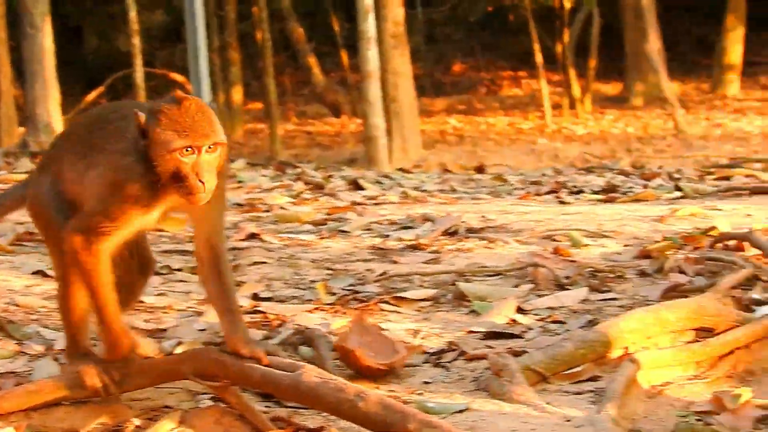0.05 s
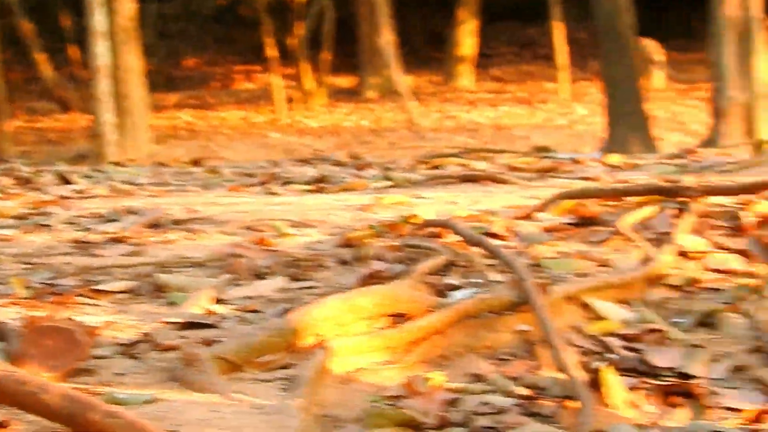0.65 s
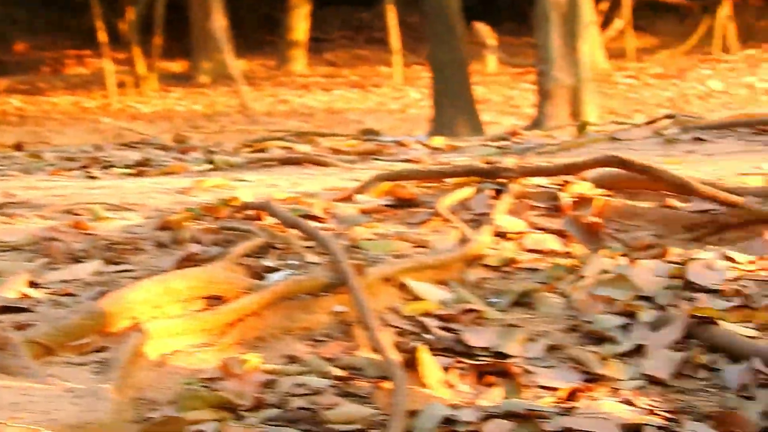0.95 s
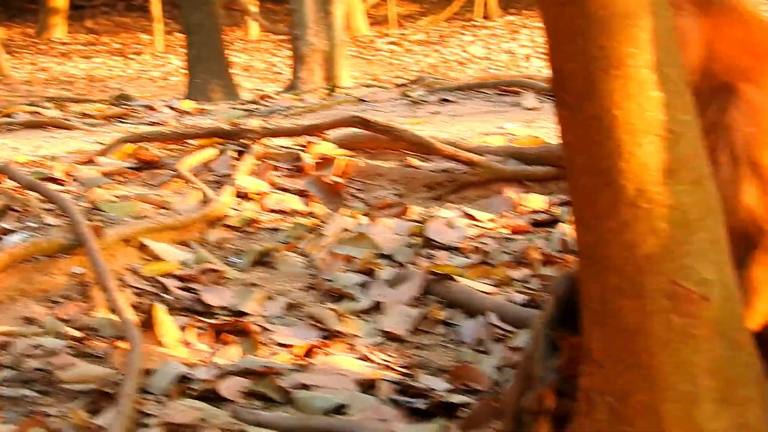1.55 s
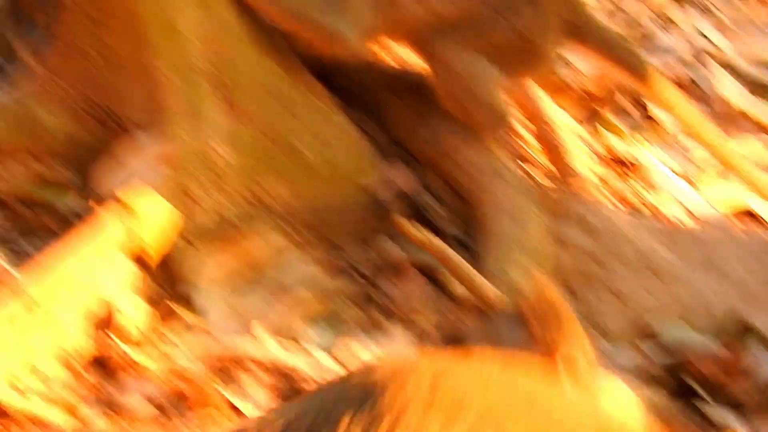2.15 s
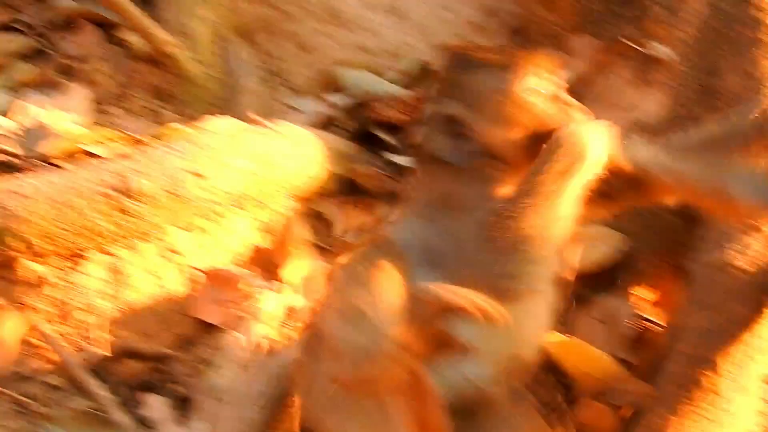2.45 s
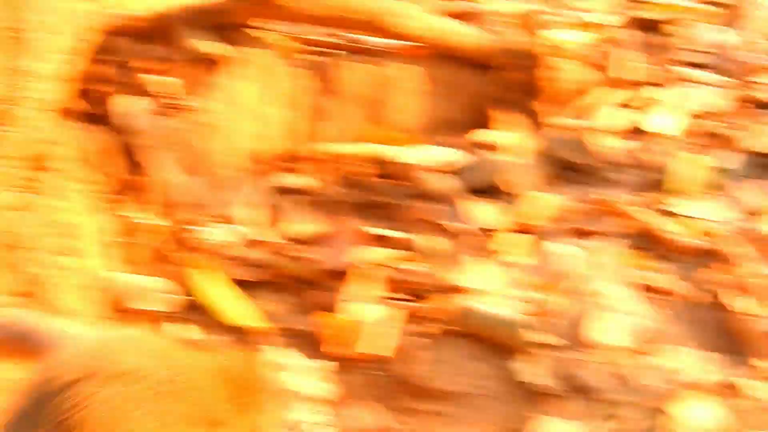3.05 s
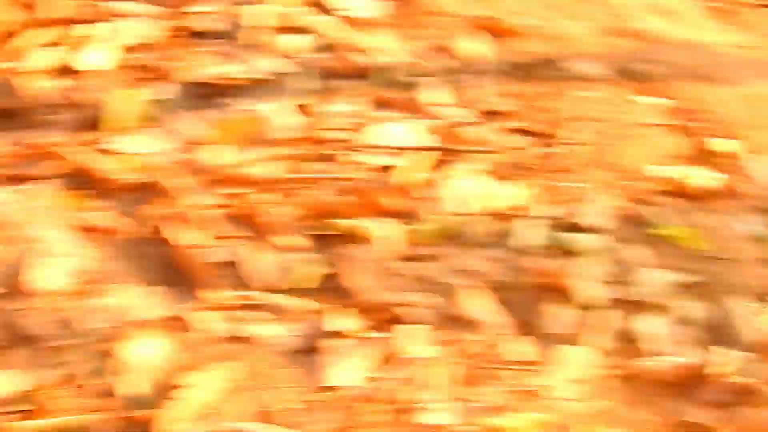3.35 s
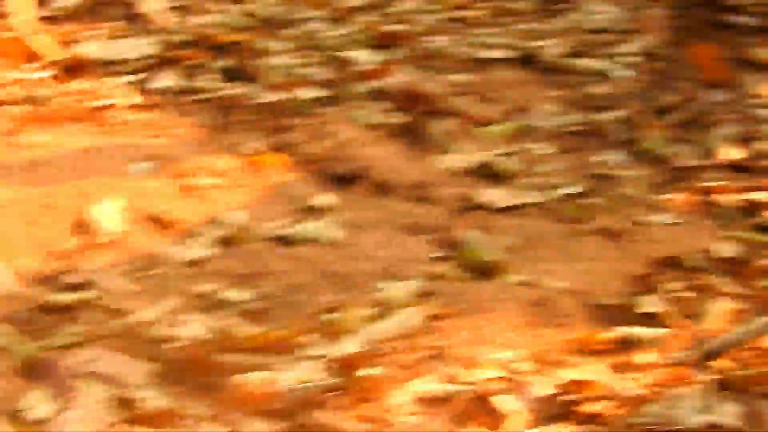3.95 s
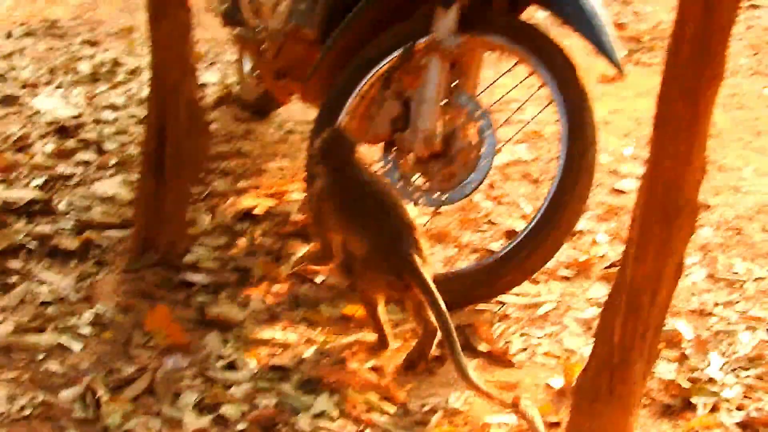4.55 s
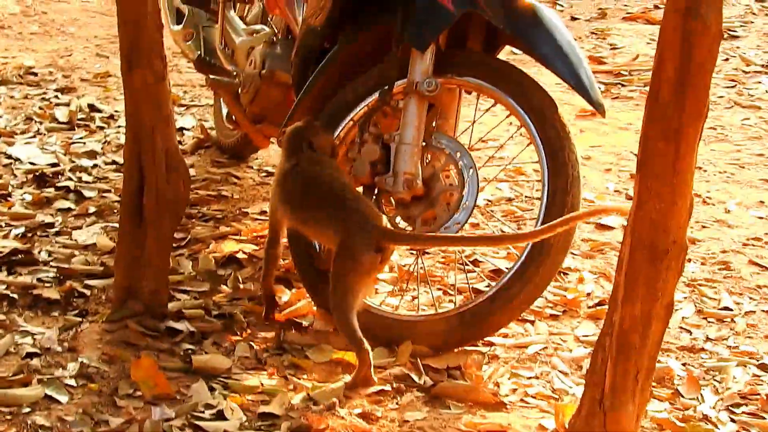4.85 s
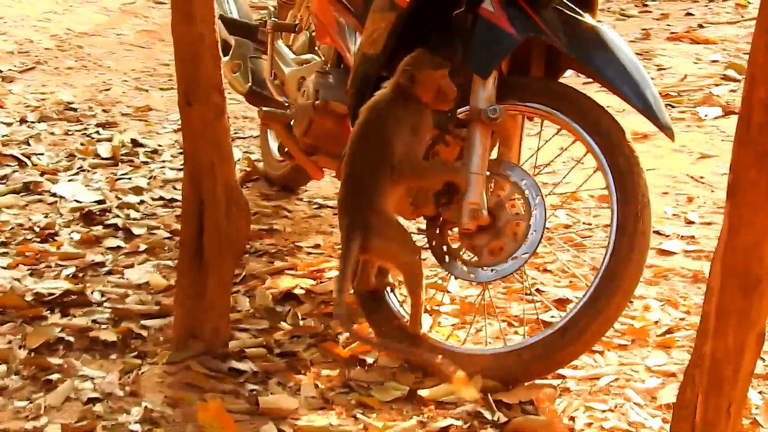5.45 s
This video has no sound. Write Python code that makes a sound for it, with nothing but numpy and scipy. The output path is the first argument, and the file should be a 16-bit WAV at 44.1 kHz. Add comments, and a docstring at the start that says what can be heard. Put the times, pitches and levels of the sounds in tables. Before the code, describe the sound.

Light, quick footfalls crunch and rustle in dry leaf litter as small monkeys run up close and away, with soft scuffs and twig ticks.

```python
"""First, faint footfalls in dry leaves: young monkeys scamper up to the microphone and run off again. Each foot
crushes a swarm of tiny cracks out of the forest floor, and the leaves rustle as they settle. Dull scuffs, a
thump and ticking twigs come from either side; something hollow is knocked once, and near the end a wheel
clatters as a monkey climbs it. A faint low outdoor hum lies behind it all, and near the end leaves swish
further off."""
import sys
import numpy as np
from scipy import signal
from scipy.fft import rfft, irfft
from scipy.io import wavfile
from scipy.ndimage import uniform_filter1d

SR = 44100
rng = np.random.default_rng(int(sys.argv[2]) if len(sys.argv) > 2 else 0)


def unload_audio(sound):
    """Save the sound as a 16-bit wav file, at the path given as the first command line argument."""
    columns = np.transpose(np.atleast_2d(sound))
    # keep every value between -1 and 1, then stretch to whole-number steps
    steps = np.round(np.clip(columns, -1, 1) * 32767)
    wavfile.write(sys.argv[1], SR, steps.astype(np.int16))


N = 247004
TIME = np.arange(N) / SR
FREQS = np.maximum(np.arange(N // 2 + 1) * SR / N, 1)
BODY_BAND = 1 / (1 + (FREQS / 4190) ** 12)   # the dull body of the leaf sound, below 4190 Hz


def from_db(db):
    """Decibels to gain."""
    return 10 ** (np.asarray(db) / 20)


def unit_rms(x):
    """Scale to rms 1."""
    return x / np.sqrt(np.mean(x ** 2) + 1e-20)


def in_time(points):
    """A curve of (t/s, value) points at every sample."""
    return np.interp(TIME, *np.transpose(points))


def response(points):
    """Gain at every frequency from (f/Hz, level/dB) points."""
    hz, db = np.transpose(points)
    return from_db(np.interp(np.log(FREQS), np.log(hz), db))


def resonance(hz, width_hz):
    """Gain of a broad resonance with steep skirts, 1 on top."""
    return 1 / (1 + .5 * ((FREQS - hz * hz / FREQS) / width_hz) ** 2)


def shaped(x, gain):
    """Filter by a gain per frequency."""
    return irfft(rfft(x) * gain, N)


def noise(gain):
    """Mono noise of the given spectrum; rms 1."""
    return unit_rms(shaped(rng.standard_normal(N), gain))


def coloured(x, hz, width_hz, boost):
    """Raise one resonance out of a sound; rms 1."""
    peak = signal.iirpeak(hz, hz / width_hz, fs=SR)
    return unit_rms(x + boost * signal.lfilter(*peak, x))


def ring(clicks, hz, t60):
    """A unit click sets a sine of height 1 ringing."""
    decay, angle = from_db(-60 / (t60 * SR)), 2 * np.pi * hz / SR
    return signal.lfilter([0, np.sin(angle)], [1, -2 * decay * np.cos(angle), decay ** 2], clicks + 1e-18)


def swell(start, rise, t60, hold=0):
    """Pressure builds over the rise time, holds, then dies away."""
    age = TIME - start
    fall_db = -60 * np.clip((age - rise - hold) / t60, 0, 2)
    return np.clip(age / rise, 0, 1) * from_db(fall_db)


def panned(x, lean_db):
    """Place a sound at constant power; lean is left minus right."""
    gains = from_db(np.outer([.5, -.5], lean_db))
    return x * gains / np.sqrt(np.mean(gains ** 2, axis=0))


# stereo width at the microphone: f/Hz, side gain/dB
SIDE_GAIN = [(130, -31), (300, -19), (1000, -14), (2200, -13), (3600, -12.5), (5000, -6.5), (6500, -3.8),
             (9000, -2.4), (12000, -.4)]
def stereo(mid, side):
    """Left and right agree in the bass and part ways in the treble."""
    return mid + shaped(side, response(SIDE_GAIN)) * np.array([[1], [-1]])


def cracks(per_s, spread_db, cap, width_hz):
    """Stereo swarm of tiny cracks, each of its own size, place and leaf pitch."""
    born = np.flatnonzero(rng.random(N) < per_s / SR)
    count = len(born)
    size = from_db(spread_db * np.minimum(rng.exponential(1, count), cap)) * rng.choice([-1, 1], count)
    place, mid_side = rng.standard_normal(count), np.zeros((2, N))
    for hz in np.linspace(900, 15000, 14):
        clicks = np.zeros((2, N))
        strength = size * rng.standard_normal(count)   # every crack excites the leaf modes differently
        clicks[:, born] = strength, strength * (place + rng.standard_normal(count)) / np.sqrt(2)
        mid_side += ring(clicks, hz, t60=np.log(1000) / (np.pi * width_hz))
    return stereo(*mid_side)


def shifting(x, patchy_db):
    """As leaves slide and curl, their resonances come and go."""
    bins = signal.stft(x, nperseg=512)[2]
    patches = uniform_filter1d(rng.standard_normal(bins.shape[1:]), 5, axis=0)   # smooth in frequency
    patches = unit_rms(uniform_filter1d(patches, 10, axis=1))   # and in time
    return signal.istft(bins * from_db(patchy_db * patches), nperseg=512)[1][:, :N]


def leaf_bands(colour):
    """Two filter gains: the crisp top from brittle edges, the lower body from flexing blades."""
    gain = response(colour)
    return gain * (1 - BODY_BAND), gain * BODY_BAND


# spectrum of crushed leaves: f/Hz, level/dB
CRUSH_SPECTRUM = [(290, -59), (500, -59), (545, -40.5), (906, -25.5), (1380, -16), (2260, -9), (2770, -14),
                  (3290, -9), (3920, -9), (4660, 0.5), (6230, 6.5), (7000, 4), (8830, -9.5), (14000, -33),
                  (16000, -38)]
# feet nearing the microphone, then leaving: t/s, rise/s, hold/s, level/dB, depth (body re crackle)/dB,
# blade resonance f/Hz
FOOTFALLS = [(0, 0.0019, 0, -44.5, -2.5, 3870), (0.151, .014, .03, -48.5, -3, 1710),
             (0.698, 0.01, 0, -45.5, -1.5, 2300), (0.922, 0.008, 0.0027, -40.5, -4.5, 3400),
             (1.148, 0.0089, 0.022, -36, -25, 3400), (1.261, 0.0032, 0, -29, -11, 3670),
             (1.373, 0.0045, 0.0054, -30, -6.5, 2100), (1.473, 0.0069, .005, -27.5, -14, 3800),
             (1.514, 0.013, 0.012, -25, -9, 4000), (1.606, 0.0079, 0, -32.5, -3, 3800),
             (1.797, 0.0086, 0, -37, -2.5, 3300), (1.924, 0.011, 0.013, -40, -3, 2200),
             (1.964, .004, 0.0034, -31.5, -4, 3830), (1.993, 0.024, 0.0094, -26.5, -5, 3040),
             (2.094, 0.0027, 0.0086, -26.5, -8, 3730), (2.162, 0.023, 0.0067, -26.5, -10, 1930),
             (2.488, .018, 0.00095, -34.5, -3.5, 1370), (2.595, 0.0097, 0.056, -33, -8, 2160),
             (2.667, .009, 0.0051, -26, -5.5, 3400), (2.73, 0.0054, 0.053, -22, -8, 3400),
             (2.795, 0.025, .05, -25.5, -6.5, 3400), (2.982, .002, .005, -32, -8.5, 3700),
             (2.999, 0.015, 0.019, -28.5, -9, 3760), (3.074, 0.028, 0.032, -26, -4, 2730),
             (3.465, .01, 0.042, -28.5, -7.5, 2380), (3.646, 0.0032, .035, -32, -6, 1760),
             (3.952, .01, 0.016, -53, 1, 3080), (4.122, 0.0083, 0.058, -44, -9.5, 2440)]
def footfalls(light_depth_db=-9, light_edge_hz=6180, octaves_per_db=0.9):
    """Each foot crushes its own patch of leaves and pushes softly on the soil."""
    swarm = shifting(cracks(per_s=7000, spread_db=2.2, cap=1.4, width_hz=1960), patchy_db=3)
    edges, blades = (unit_rms(shaped(swarm, band)) for band in leaf_bands(CRUSH_SPECTRUM))
    soil = from_db(-35.5) * noise(resonance(596, width_hz=420))
    out = np.zeros((2, N))
    for start, rise, hold, level_db, depth_db, blade_hz in FOOTFALLS:
        first = int(start * SR)
        crush = swell(start, rise, t60=0.15, hold=hold)
        settle = swell(start, rise, t60=0.49, hold=hold)
        tread = from_db(level_db) * (crush + settle)[first:first + SR] / 2
        patch = rng.integers(N - SR) + np.arange(len(tread))
        # a deeper tread breaks larger pieces, which sound lower
        edge_hz = light_edge_hz / 2 ** (octaves_per_db * max(depth_db - light_depth_db, 0))
        crisp = coloured(edges[:, patch], edge_hz, width_hz=1400, boost=0.79)
        body = coloured(blades[:, patch], blade_hz, width_hz=600, boost=1)
        out[:, first:first + SR] += tread * (crisp + from_db(depth_db) * body + soil[patch])
    return out


# spectrum of stirred leaves: f/Hz, level/dB
RUSTLE_SPECTRUM = [(350, -68), (600, -13), (801, -13.5), (919, -21), (1410, -8), (1930, -9.5), (2440, -6.5),
                   (3480, -6.5), (3890, -11.5), (5790, -1), (6550, -1), (9360, -20), (11700, -33),
                   (14900, -44), (16000, -49)]
# stirring of the leaves around the microphone: t/s, relative level/dB
LEAF_STIR = [(0.0, -50.5), (1.46, -35), (1.68, -40), (1.9, -40), (2.14, -35), (2.31, -40.5), (2.59, -43),
             (2.79, -46), (2.93, -36), (3.27, -36.5), (3.6, -41.5), (3.87, -43), (4.04, -47.5), (4.26, -52),
             (4.43, -54.5), (5.16, -51), (5.4, -47), (5.6, -43.5)]
def rustle(body_follows=0.53):
    """Finer crackle between footfalls; its body swings less than its top, so louder is crisper."""
    stir_db = in_time(LEAF_STIR)
    crisp_db = stir_db - 1
    body_db = -53.5 + body_follows * (stir_db - stir_db.mean())
    swarm = shifting(cracks(per_s=6000, spread_db=0.5, cap=8.1, width_hz=1250), patchy_db=3.5)
    edges, blades = (unit_rms(shaped(swarm, band)) for band in leaf_bands(RUSTLE_SPECTRUM))
    return from_db(crisp_db) * edges + from_db(body_db) * blades


# spectra of the outdoor hum and of a far drone: f/Hz, level/dB
HUM_SPECTRUM = [(20, -41), (38, -27), (55, -6.5), (90, -3), (140, -0.5), (215, 0.5), (300, -3),
                (400, -11.5), (550, -20), (800, -17), (1200, -5), (2400, -10), (8000, -86)]
DRONE_SPECTRUM = [(120, -47), (220, -4), (295, 5), (350, -6.5), (440, -2), (560, -7), (750, -31),
                  (3000, -90)]
# the hum swells a little and dips: t/s, level/dB
HUM_LEVEL = [(0, -61), (1.1, -60), (1.9, -57.5), (2.4, -60.5), (3.1, -57), (3.35, -63.5), (4.2, -60.5),
             (5.6, -58.5)]
def forest_ambience(drone_grows_s=3.65, drone_db_per_s=7.5):
    """Low hum all around, a far drone that grows late, and a thin buzz as of distant insects."""
    hum = unit_rms(stereo(*shaped(rng.standard_normal((2, N)), response(HUM_SPECTRUM))))
    drone = noise(response(DRONE_SPECTRUM))
    drone_db = -71 + drone_db_per_s * np.maximum(TIME - drone_grows_s, 0)
    buzz = unit_rms(stereo(*shaped(rng.standard_normal((2, N)), resonance(6380, width_hz=330))))
    return from_db(in_time(HUM_LEVEL)) * hum + from_db(drone_db) * drone + from_db(-56) * buzz


# dull scuffs on either side of the microphone: t/s, rise/s, f/Hz, width/Hz, level/dB, lean/dB
SCUFF_STROKES = [(.236, 0.069, 1320, 200, -37.5, 2), (.85, 0.022, 1150, 650, -45, 5),
                 (.85, .012, 3250, 450, -38, 0), (1.1, 0.047, 1310, 280, -44, 5),
                 (1.549, .007, 1270, 350, -44.5, 2), (1.765, .04, 1300, 550, -49, 1),
                 (2.37, 0.034, 810, 400, -53, 1), (2.59, 0.017, 1000, 300, -44.5, -1),
                 (4.33, .06, 705, 55, -43, -4), (4.36, 0.054, 1130, 330, -51, 1),
                 (4.37, 0.091, 170, 300, -52, 0), (4.73, 0.075, 1400, 800, -53.5, 13),
                 (4.88, 0.06, 1400, 800, -53, 4), (5.2, 0.069, 960, 433, -43, -7.5),
                 (5.451, .008, 2300, 1000, -41, -3), (5.486, .008, 1600, 900, -37, -2)]
def scuffs(slips_per_s=1800, smooth_share=0.45, lowpass_hz=7000):
    """Quick uneven slips excite one resonance with a broad skirt each time."""
    friction = rng.standard_normal((2, N)) * ((rng.random(N) < slips_per_s / SR) + smooth_share)
    slips = stereo(*friction)
    out = np.zeros((2, N))
    for start, rise, hz, width_hz, level_db, lean_db in SCUFF_STROKES:
        skirt = from_db(-20.5) * resonance(1.1 * hz, width_hz=1400)
        scrape = unit_rms(shaped(slips, resonance(hz, width_hz) + skirt))
        out += panned(from_db(level_db) * swell(start, rise, t60=0.34) * scrape, lean_db)
    return shaped(out, 1 / (1 + (FREQS / lowpass_hz) ** 4))


# thud and clack, centre of the image: rise/s, t60/s, f/Hz, width/Hz, relative level/dB
THUMP_PARTS = [(0.021, 0.23, 208, 59, 0.5), (0.0014, 0.039, 1160, 430, 9)]
def thump(start=0.849, level_db=-41.5):
    """Something lands with a short clack and a low thud."""
    return sum(from_db(level_db + db) * swell(start, rise, t60) * noise(resonance(hz, width_hz))
               for rise, t60, hz, width_hz, db in THUMP_PARTS)


def struck(blows, modes, contact_hz):
    """Every blow rings all the modes at the pitch of the piece it hits; a soft contact dulls it."""
    contact = signal.butter(2, contact_hz, fs=SR, output="sos")
    out = np.zeros((2, N))
    for start, level_db, pitch, lean_db in blows:
        first = int(start * SR)
        click = signal.unit_impulse(min(SR // 2, N - first))
        tone = np.zeros(len(click))
        for k, (hz, db, t60) in enumerate(modes):
            mode = (-1) ** k * from_db(level_db + db) * ring(click, hz * pitch, t60)
            # little radiates below a mode
            radiation = signal.butter(2, 0.73 * hz * pitch, "high", fs=SR, output="sos")
            tone += signal.sosfilt(radiation, mode)
        out[:, first:first + len(tone)] += panned(signal.sosfilt(contact, tone), lean_db)
    return out


# modes of the small struck pieces, twigs and a wheel: f/Hz, relative level/dB, t60/s
TICK_MODES = [(1080, -28, 0.012), (1280, -12.5, 0.013), (2584, -5.5, 0.028), (3180, 1.5, 0.0092),
              (3500, -7, 0.025)]
# twig ticks left of the microphone, then a wheel clattering a little right: t/s, strike level/dB, pitch ratio,
# lean/dB
TICK_BLOWS = [(.8495, -20.5, 1.02, 7), (.881, -29, 1.06, 7), (3.8475, -22.5, .99, 13),
              (3.888, -23, 1.02, 15), (5.4565, -28, .48, -3), (5.4625, -27, .7, -6), (5.4935, -24, .72, -2),
              (5.497, -28, 1.1, -2), (5.5025, -21, .66, -2), (5.5175, -22.5, .42, -2),
              (5.539, -39, .66, -2)]
def twigs_and_wheel():
    """Twigs tick together and ring briefly; near the end a wheel clatters as a monkey climbs it."""
    return struck(TICK_BLOWS, TICK_MODES, contact_hz=5560)


def tree_echo(x):
    """Trunks and ground scatter a thin, short tail back to the microphone."""
    tail = (rng.standard_normal((2, N)) * swell(0, rise=0.003, t60=0.52))[:, :SR]
    tail /= np.sqrt(np.sum(tail ** 2, axis=1, keepdims=True))
    mono = x.mean(axis=0, keepdims=True)
    return stereo(*signal.fftconvolve(mono, tail, axes=1)[:, :N])


# single leaves breaking close by: t/s, level/dB, body re crack/dB
LEAF_SNAPS = [(1.2645, -23, -12), (1.378, -15, -2), (1.48, -20, -12), (1.527, -20, -8), (1.9685, -24, -10),
              (2.0255, -16, -10), (2.0978, -15, -12), (2.1, -15, -12), (2.1035, -14, -6), (2.197, -19, -12),
              (2.286, -24, -8), (2.674, -17, -9), (2.7355, -12, -10), (2.743, -14, -6), (2.774, -15, -10),
              (2.986, -19, -11), (3.018, -15.5, -11), (3.4705, -19, -9), (3.651, -15, -4),
              (3.888, -21, -10), (4.0885, -29, -14)]
def leaf_snaps(tear_db=-14, tear_t60=0.012):
    """A leaf breaks with one sharp crack and tears on for a few milliseconds."""
    crisp, body = np.zeros((2, 2, N))
    age = TIME[:SR // 20]
    for start, level_db, body_db in LEAF_SNAPS:
        first = int(start * SR)
        crack = from_db(tear_db - 60 * age / tear_t60) * rng.standard_normal((2, len(age)))
        crack[0, 0] = 1   # the break itself, in the mid channel
        crisp[:, first:first + len(age)] += from_db(level_db) * crack
        body[:, first:first + len(age)] += from_db(level_db + body_db) * crack
    edge, blade = leaf_bands(CRUSH_SPECTRUM)
    return stereo(*(shaped(crisp, edge / edge.mean()) + shaped(body, blade / blade.mean())))


# modes of the hollow thing: f/Hz, relative level/dB, t60/s
HOLLOW_MODES = [(183, -38, .3), (982, -15, .21), (1400, -17, .05), (1220, 1, .011), (2450, -22, .02)]
# one knock, almost straight ahead: t/s, strike level/dB, pitch ratio, lean/dB
KNOCK_BLOWS = [(1.7539, -13, 1, 1), (1.7606, -22, 1, 1)]
def hollow_knock():
    """Something hollow rings from two contacts so close that they sound as one."""
    return struck(KNOCK_BLOWS, HOLLOW_MODES, contact_hz=3000)


# leaves far from the microphone: t/s, rise/s, hold/s, level/dB
FAR_SWISHES = [(4.582, 0.048, 0.2, -60), (5.12, .08, 0.27, -65)]
def far_swishes():
    """Brushed leaves give a soft swish of fine, high crackle."""
    swarm = cracks(per_s=6000, spread_db=-3, cap=4.6, width_hz=1600)
    fine = unit_rms(shaped(swarm, resonance(8140, width_hz=1400) ** 2))
    return fine * sum(from_db(db) * swell(start, rise, t60=0.36, hold=hold)
                      for start, rise, hold, db in FAR_SWISHES)


# the monkeys' path, in front of the microphone and then off to the left: t/s, lean/dB
MONKEY_PATH = [(0, -4), (.6, 1), (1.5, 1), (2.1, -1.5), (3.15, -0.5), (3.5, -1), (3.8, 15), (4.9, 8),
               (5.3, 6)]
def scene():
    """The body of the leaf sound follows the animals, while its crisp top comes from all around."""
    ticks, knock = twigs_and_wheel(), hollow_knock()
    echoes = tree_echo(from_db(-4.5) * ticks + from_db(-3) * knock)
    litter = footfalls() + rustle() + far_swishes() + leaf_snaps()
    body = shaped(litter, BODY_BAND)
    leaves = panned(body, in_time(MONKEY_PATH)) + panned(litter - body, lean_db=-0.66)
    return leaves + ticks + knock + echoes + thump() + scuffs() + forest_ambience()


def record(dry, cutoff_hz=15900):
    """The top of the microphone signal is cut steeply."""
    return signal.sosfilt(signal.ellip(10, .1, 80, cutoff_hz, fs=SR, output="sos"), dry)


dry = scene()
out = record(dry)
unload_audio(out)
```